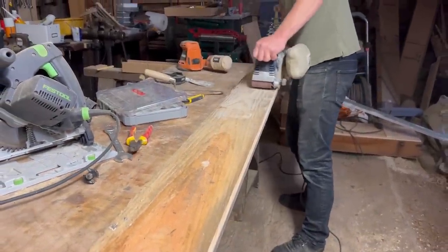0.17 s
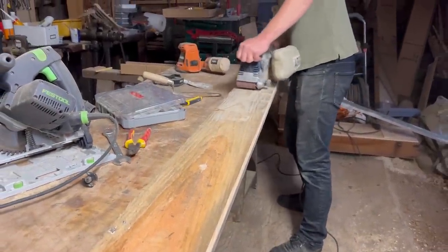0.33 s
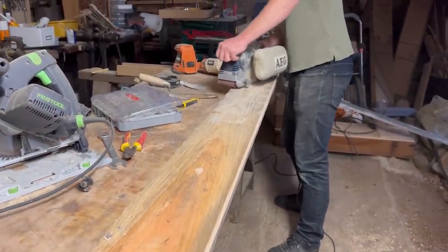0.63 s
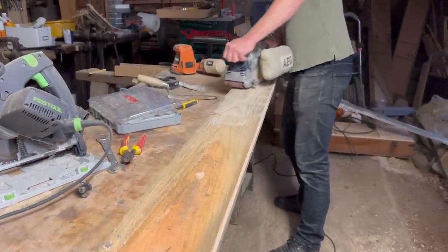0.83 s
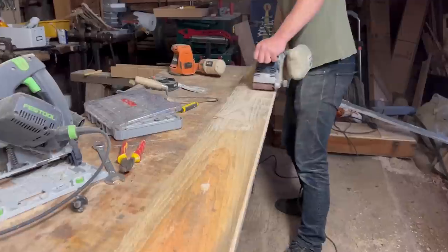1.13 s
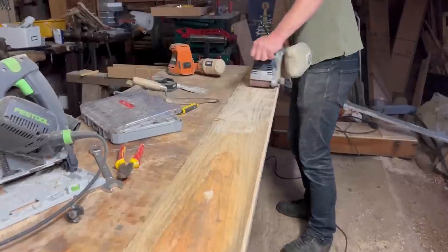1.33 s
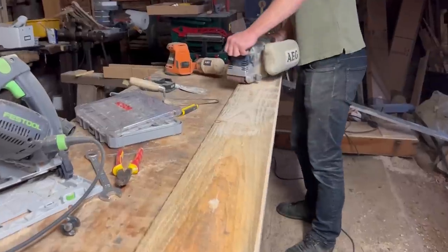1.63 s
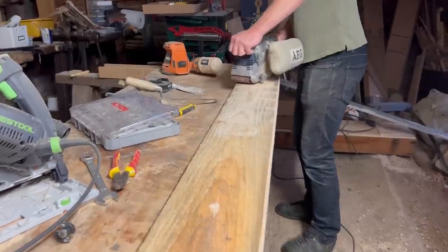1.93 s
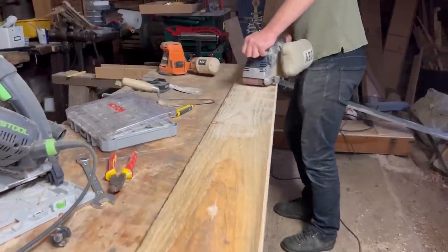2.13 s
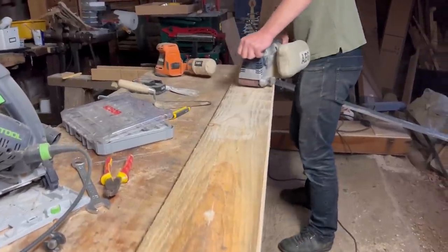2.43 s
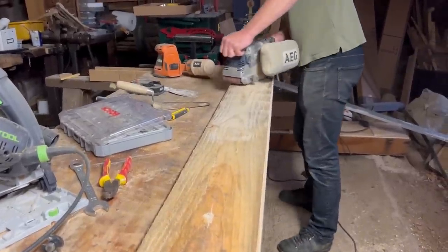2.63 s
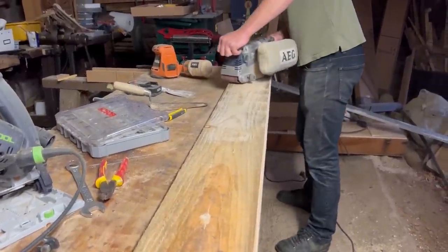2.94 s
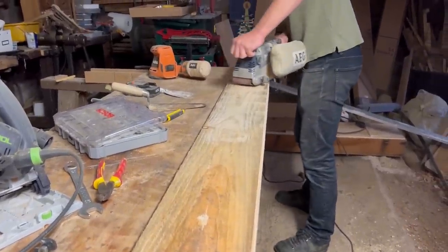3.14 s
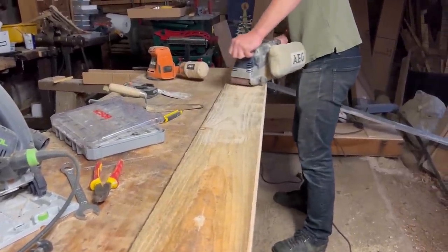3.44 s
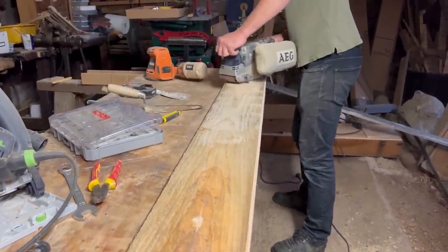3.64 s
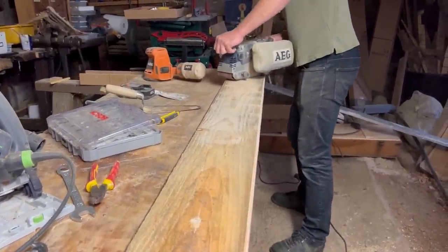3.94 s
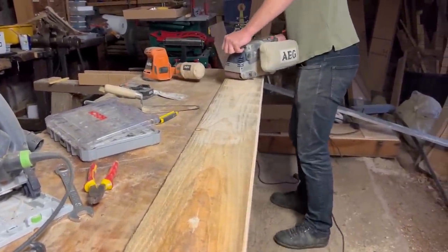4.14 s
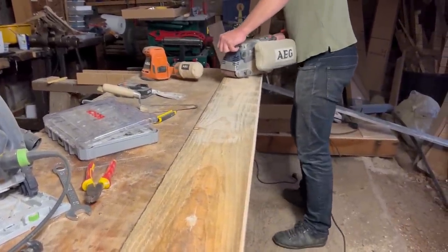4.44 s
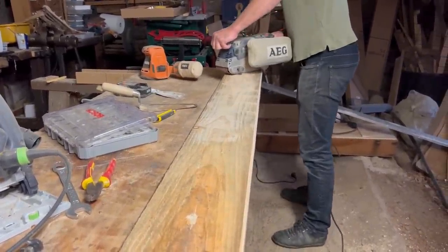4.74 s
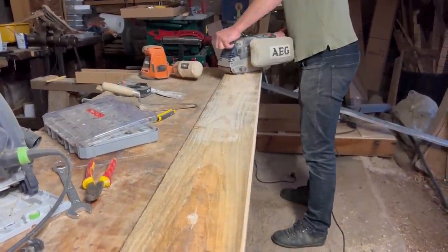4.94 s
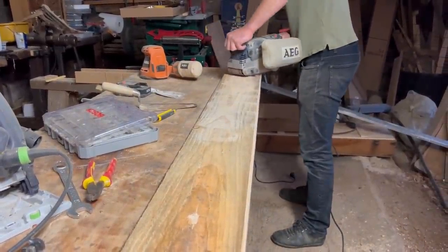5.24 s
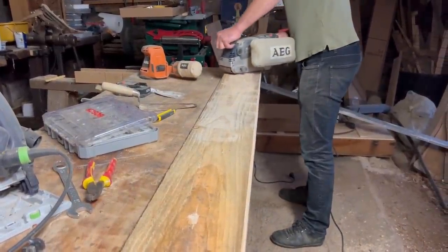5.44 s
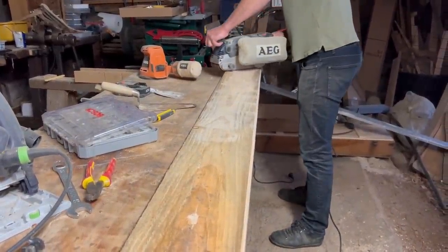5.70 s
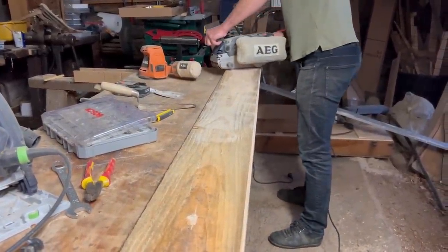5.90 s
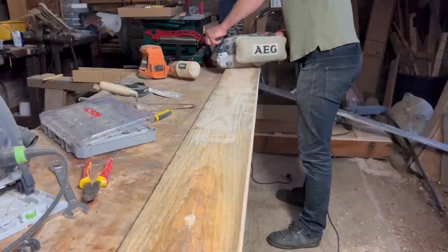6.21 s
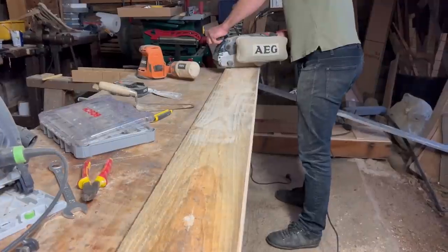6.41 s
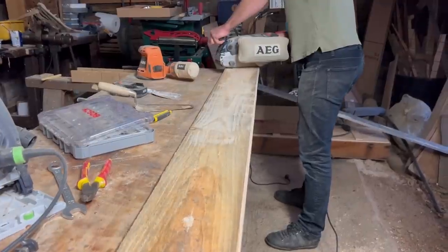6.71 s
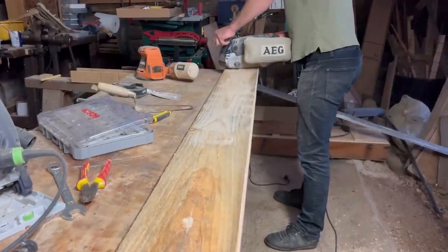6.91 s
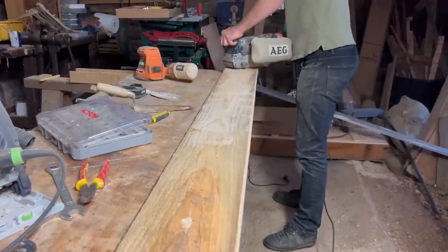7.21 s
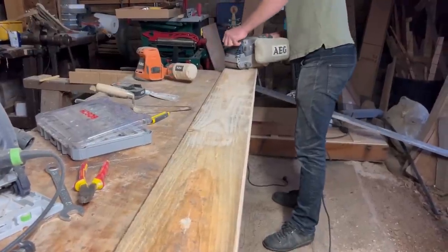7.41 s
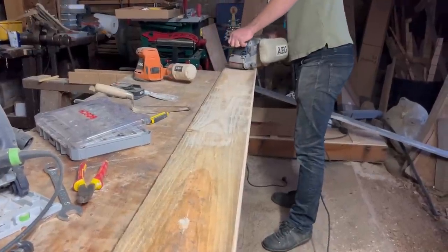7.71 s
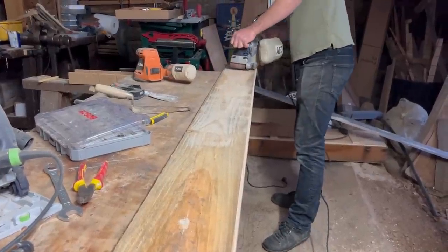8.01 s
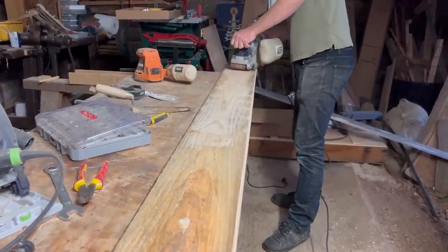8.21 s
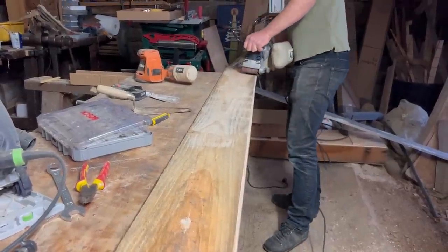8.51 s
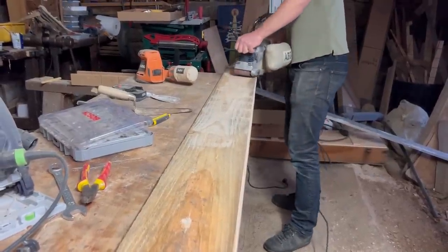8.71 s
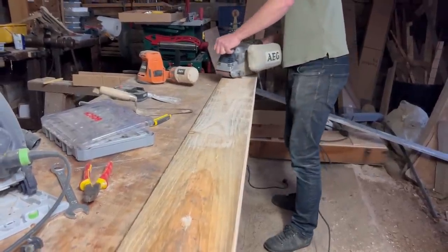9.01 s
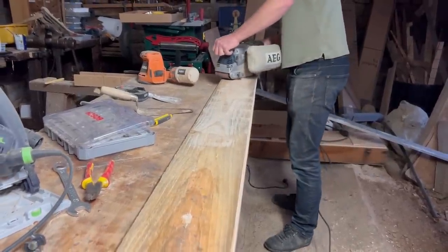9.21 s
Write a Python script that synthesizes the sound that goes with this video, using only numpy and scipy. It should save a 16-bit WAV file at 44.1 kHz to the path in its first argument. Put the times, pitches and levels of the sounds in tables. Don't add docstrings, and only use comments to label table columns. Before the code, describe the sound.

Close stereo sound of a power belt sander in a cluttered indoor workshop, already at speed and never stopping. Rough abrasive hiss covers everything, flickering with pressure and sometimes biting harder at the belt edge. A piercing motor tone is strong early, then comes and goes in dips and swells. Low fluttering knocks and faint hum travel through the board; the motor runs a little faster in the last second or so.

```python
import sys
import numpy as np
from scipy import signal
from scipy.fft import rfft, irfft, next_fast_len
from scipy.io import wavfile
from scipy.ndimage import uniform_filter1d

SR = 44100
rng = np.random.default_rng(int(sys.argv[2]) if len(sys.argv) > 2 else 0)


def elevation(decibels):
    levels = np.asarray(decibels, float)
    return 10 ** (levels / 20)


def persist_wave(psi):
    counts = np.round(np.clip(psi, -1, 1) * 32767).astype(np.int16)
    wavfile.write(sys.argv[1], SR, np.atleast_2d(counts).T)


N = 412335

# start_s, speed_turns_per_s
SHAFT_SPEED = [(0.0, 294.5), (0.33, 293.6), (0.63, 298.7), (0.8, 299.2), (1.7, 291.4), (2.01, 286.1),
               (2.78, 299.5), (3.66, 304.5), (4.04, 302.4), (4.21, 300.1), (4.89, 301.1), (5.14, 304.9),
               (6.25, 299.1), (7.56, 305.1), (8.17, 315.6), (8.61, 317.7), (9.12, 310.0), (9.35, 311.6)]
# centre_s, gain_turns_per_s, half_width_s
HAND_EASING = [
    (1.0, 3.47, 0.11),
    (1.44, 9.2, 0.35),
    (2.23, 20.3, 0.44),
    (3.23, 4.61, 0.2),
    (6.7, 1.47, 0.26),
    (7.14, 2.48, 0.18),
    (8.76, 3.65, 0.22),
]

# start_s, level_db, left_minus_right_db
WHINE_LEVEL = [(0.0, -14, 2), (1.12, -5.5, -12), (1.66, -10.5, 0.5), (1.99, -23.5, 6.5), (2.09, -26.5, -6),
               (2.66, -16.5, -10.5), (2.9, -20, 6), (4.09, -24.5, 5.5), (4.74, -21.5, -15), (5.35, -30, 14),
               (5.58, -22, -5), (6.03, -16, 1), (6.38, -16, 0), (7.13, -22.5, -13), (7.76, -15.5, -18.5),
               (8.13, -19, 0.5), (8.24, -22, 6), (9.35, -15.5, -12.5)]
# centre_s, level_db, half_width_s
WHINE_CRESTS = [(5.35, 3.5, 0.03), (.33, 2, 0.058), (1.28, -2, .07), (1.9, 3, 0.1), (2.595, -14, 0.04),
                (3.13, 5.5, 0.056), (3.35, 2.5, 0.064), (4.3, -1.5, 0.073), (5.72, -3, 0.051),
                (4.63, -5, 0.05), (4.125, -5, .025), (6.6, -1.5, 0.13), (7.05, 2, 0.045), (7.26, 3, 0.046),
                (7.62, -4, .06), (8.1, -1, .04), (9.22, 3.5, .04), (3.16, -5, .03), (4.8, -2, 0.04),
                (2.7, -1, .05), (7.9, 0, 0.073), (9.31, 1.5, .03)]
# centre_s, signed_share_left, half_width_s
LEFT_NULLS = [(0.953, 0.27, 0.49), (1.506, 0.15, 0.22), (2.075, 0.91, 0.027), (2.17, -0.09, 0.017),
              (2.358, 0.32, 0.048), (2.529, -0.4, 0.039), (2.605, -0.12, 0.033), (3.155, -0.25, 0.077),
              (3.44, .55, 0.062), (3.7, .6, 0.06), (4.12, 0.067, 0.06), (4.425, 0.55, 0.035),
              (4.607, 0.95, 0.049), (4.93, 0.71, 0.065), (5.36, 0.92, 0.033), (5.716, 0.75, 0.085),
              (7.176, 0.465, 0.035), (7.222, -0.35, 0.11), (7.6, 0.44, .04), (7.921, -0.13, 0.055),
              (8.06, 0.66, .04), (8.319, -0.55, 0.22), (8.583, 0.34, 0.15), (8.757, 0.076, 0.029),
              (8.798, 0.31, 0.068), (9.26, 0.33, 0.023)]
# centre_s, signed_share_left, half_width_s
RIGHT_NULLS = [(0.635, 0.28, 0.25), (0.942, 0.15, 0.7), (1.553, -0.007, 0.26), (1.801, 0.297, 0.043),
               (2.054, -0.44, 0.022), (2.351, 0.4, 0.082), (2.606, -0.21, 0.26), (3.115, 0.47, 0.055),
               (3.538, 0.87, 0.038), (3.622, -0.24, 0.13), (4.621, 0.25, 0.27), (4.936, 0.25, 0.08),
               (5.344, 0.28, 0.034), (5.35, -0.835, 0.044), (6.873, 0.36, 0.16), (7.336, 0.16, 0.39),
               (7.63, -0.29, 0.38), (7.868, 0.17, 0.12), (7.911, 0.68, 0.033), (8.057, 0.2, 0.14),
               (8.514, 0.036, 0.035), (8.596, -0.12, 0.051), (8.761, 0.21, 0.037), (8.782, -0.43, 0.049),
               (9.171, 0.16, 0.45), (9.347, 0.55, 0.019)]
# centre_s, share_left, half_width_s
SHARED_NULLS = [(3.13, 0.43, 0.05), (4.1, 0.44, 0.029), (4.33, 0.83, 0.051), (4.62, 0.71, 0.091),
                (5.35, 0.59, 0.053), (6.97, 0.84, 0.038), (7.8, 0.66, .12)]

TONE_ORDERS = (2, 12, 14, 18)
TONE_LEVELS = (-46, -31, -35, -32.5)
# right_minus_left_db, left_lead_rad
TONE_SIDES = [(-2.5, 0.67), (-19, 1.36), (-4.5, 0.093), (-34, -1.3)]
# centre_s, half_width_s
NULLS_2X = [(.22, .1), (.6, 0.45), (1.89, 0.13), (2.4, 0.087), (2.92, .15), (3.74, 0.22), (4.32, 0.15),
            (4.65, 0.13), (5.0, 0.16), (5.5, 0.1), (8.3, 0.13), (8.8, 0.25), (9.34, 0.12)]
NULLS_12X = [(.15, 0.23), (.75, 0.091), (1.28, 0.37), (1.6, 0.17), (2.33, 0.16), (2.92, 0.14), (3.68, 0.37),
             (4.3, 0.046), (4.6, .08), (4.9, 0.089), (5.19, 0.2), (5.75, 0.15), (7.3, 0.25), (7.8, 0.089),
             (9.2, 0.059)]
NULLS_14X = [(.15, 0.23), (1.16, 0.2), (1.6, 0.054), (2.2, 0.14), (3.4, 0.038), (4.33, 0.21), (4.96, 0.088),
             (5.64, 0.16), (6.35, 0.13), (6.65, 0.4), (7.1, 0.13), (8.56, 0.11)]
NULLS_18X = [(0.0, 0.16), (.33, 0.052), (.55, 0.13), (1.28, 0.3), (2.15, 0.26), (2.5, 0.14), (2.75, 0.2),
             (3.3, 0.29), (3.63, 0.12), (4.01, 0.069), (4.35, 0.045), (4.7, 0.12), (5.19, 0.26),
             (5.6, 0.25), (6.05, 0.05), (6.65, 0.11), (7.0, 0.12), (7.25, .2), (8.2, 0.12), (8.55, 0.083),
             (9.0, 0.059), (9.34, 0.094)]
# multiple_of_shaft, level_db
FAINT_TONES = [(1, -60.5), (5, -51), (7, -44.5), (13, -51), (19, -52), (24, -52)]
TONE_SWELLS = {1: [(2.82, 15, .06), (3.8, 15, 0.38), (5.0, 10, 0.38)], 2: [(.35, 3, 0.074),
               (.97, 11, 0.038), (1.25, 6, 0.21), (1.7, 2, .05), (3.95, 5, .08), (4.85, 6, .12),
               (6.7, -19, .07), (7.3, -1, .1), (7.55, -5, 0.043), (8.3, 7, 0.16), (9.03, -14, .05)],
               19: [(6.48, 15, .1)], 7: [(5.6, 4, .08), (7.32, 7, 0.086), (8.2, -6, .3)],
               12: [(.45, 2, .12), (1.72, -7, .1), (2.08, 2, .1), (4.2, 0, .1), (4.8, 3, .05),
               (5.25, -3, .06), (5.63, -9, .04), (5.95, -2, .05), (6.3, 5.5, 0.22), (6.65, -5, 0.33),
               (7.25, -13, .05), (7.92, -5, .07), (8.07, 0, .05), (8.17, -8, .03), (8.25, 6.5, 0.13),
               (9.28, -6, .05)], 14: [(0.64, 3.5, 0.1), (0.34, 4, 0.052), (2.2, 7, .1), (2.94, -2, 0.12),
               (3.7, 4, 0.045), (3.75, -1, 0.037), (4.9, 4, .08), (5.1, -3, .08), (6.3, -6, .05),
               (7.88, -2, 0.063), (4.5, -4, 0.045), (5.45, 3, .06), (7.7, -3, .04), (9.12, 5, 0.11)],
               18: [(.22, 8, .05), (1.88, 6, 0.068), (2.35, 5, .15), (4.05, -3, .1), (4.23, 1, .04),
               (4.36, -5, .06), (4.5, 4, .05), (4.62, 1, .05), (4.9, -8, 0.19), (5.5, -3, .06),
               (5.77, -9, .06), (6.26, 6, .06), (6.45, 0, 0.072), (6.77, -11, 0.073), (7.62, 3, .15),
               (7.81, -4, 0.035), (8.1, -11, 0.092), (9.17, 3, .04), (9.28, -5, .06), (6.37, -5, .05)]}

# start_s, hand_pressure_db, lean_from_grit_to_board_db, board_resonance_hz
SANDING = [(0.0, 1, 2.5, 1270), (0.34, 0.5, -2, 1090), (0.62, -1, 2, 1100), (1.04, 0, 0, 1220),
           (1.38, 1.5, -1.5, 1320), (1.83, 0, 4, 1070), (2.3, -0.5, -2, 1170), (3.1, 0.5, 4, 1040),
           (3.43, 0, -2.5, 1070), (4.0, 0.5, .5, 1160), (5.0, 0, 2, 1240), (5.17, 1, 3, 1200),
           (5.36, -1, 0, 1160), (5.71, 2.2, 3.5, 1360), (6.35, 3, 2, 1410), (7.06, -1.5, 3, 1070),
           (7.92, 2, 3.5, 900), (9.35, 1, 3, 1180)]
SANDING_CENTRES = (500, 1300, 2800, 4500)
PRESSURE_SHARE = (0.64, 1, 1.77, 0.62)
LEAN_SHARE = (0.9, 0.054, -0.39, 0.0084)
# centre_s, over_hiss_db, length_s
EDGE_BITES = [(.96, 2.5, 0.068), (1.44, 0.5, 0.04), (2.107, 4, .06), (3.15, 7.5, 0.15), (3.326, 4, 0.044),
              (4.523, 3, 0.081), (4.802, 2.5, .1), (5.16, 3.5, 0.1), (5.742, 1.5, 0.13), (6.79, 3.5, 0.11),
              (8.38, 4.5, 0.11)]
# centre_s, resonance_hz, level_db, half_width_s
GRAIN = [(.07, 2680, 1, 0.14), (0.151, 362, -10, .12), (.3, 2850, 4, 0.1), (.45, 2750, 2, 0.06),
         (.8, 235, -9, 0.19), (6.5, 2800, 0.5, 0.15), (1.0, 2780, 4.5, .1), (1.4, 1300, -5, 0.087),
         (1.43, 2730, 3, 0.048), (2.05, 2800, 3, 0.12), (2.05, 1280, 4, .08), (2.11, 2750, 2.5, 0.056),
         (2.3, 2750, 6.5, .08), (1.22, 2750, 1, .08), (2.7, 230, -5, .2), (4.65, 2800, 1.5, .15),
         (3.3, 790, 7, 0.078), (4.1, 1160, 3, 0.27), (5.0, 220, -1, 0.42), (5.2, 2820, 2.5, 0.056),
         (5.55, 1300, 2, 0.05), (6.15, 1400, -0.5, 0.17), (6.2, 2800, -4, 0.29), (6.2, 4300, -2, .2),
         (6.8, 480, 9, 0.18), (6.8, 1280, 6, 0.087), (7.05, 1170, -3.5, 0.2), (7.35, 2800, 1.5, 0.14),
         (8.1, 130, -5, .2), (8.15, 70, -8, .25), (8.2, 402, 2, 0.055), (8.45, 1280, 9, 0.038),
         (8.7, 2750, 3.5, 0.11), (8.83, 420, 6, .04), (9.2, 2800, 2, 0.11), (.6, 12500, -5, 0.43),
         (1.5, 12500, -8, 0.09), (2.0, 12300, -5.5, 0.23), (3.25, 12500, 5, .05), (5.22, 12400, 7, .06),
         (5.75, 12500, 1, .05), (2.75, 6000, -5, 0.6), (3.8, 6000, 2.5, 0.94), (2.5, 5800, 6, 0.1),
         (5.5, 6000, -2.5, 0.13), (6.55, 6140, 3, 0.23), (7.4, 6200, 2, 0.21), (8.35, 6000, -4, 0.27),
         (5.7, 780, 4.5, 0.13), (7.9, 790, 6, .08)]
# frequency_hz, density_db_per_hz
GRIT_COLOUR = [(30, -19), (90, -14), (180, -12.5), (400, -5), (700, -6.5), (1300, -0.5), (2100, 2),
               (2900, 3.5), (3800, -1.5), (6300, -1), (7500, -9), (9000, -9.5), (12000, -12.5),
               (15500, -15.5)]
# centre_hz, width_hz, level_db
BODY = [(189, 22, -2.5), (279, 6.9, -13), (312, 27, 4), (480, 48, 5), (660, 19, -3), (780, 71, 1.5),
        (2680, 390, 0.5), (1540, 40, -4), (2370, 690, -4), (428, 65, -4.5), (5230, 440, 2),
        (6790, 210, 2.5), (8440, 560, -3), (9400, 790, -0.5)]

# start_s, hum_db, joint_knock_db
BOARD_LOW_END = [(0.0, -33.5, -51), (0.42, -60, -52), (0.73, -46, -52), (0.96, -57, -54),
                 (1.19, -58, -49.5), (2.03, -63, -54.5), (2.34, -39.5, -53), (2.6, -73, -53.5),
                 (3.3, -42, -54.5), (3.74, -68, -58), (3.96, -51, -57.5), (4.67, -48, -52),
                 (5.22, -42, -54.5), (5.85, -49, -52), (7.0, -47.5, -59), (8.04, -63, -56),
                 (8.51, -60, -49), (9.34, -44, -48)]
# mode_hz, level_db, t60_s
BOARD_MODES = [(100, -24, 0.27), (125.3, 7, 0.17), (135, 0, 0.18), (157.8, 1.5, 0.39), (220, -11, 0.23),
               (253.4, -13, 0.24), (313, -30, 0.2), (475, -27, 0.2)]
# centre_s, level_db, half_width_s
PLATEN_FLAT = [(1.3, 2, 0.14), (2.34, 12, 0.12), (3.32, 12, 0.24), (3.95, 13.5, 0.19), (4.67, -3, 0.25),
               (5.25, 11, 0.11), (6.7, 7, .2), (7.0, -11, 0.16), (7.5, 8, 0.44), (8.5, 3, 0.18),
               (9.3, -8, .2)]
# centre_s, level_db, half_width_s
KNOCK_ROCKS = [(.37, -5, 0.045), (.65, 1, .15), (1.55, -4, 0.13), (2.07, -7, .05), (2.6, -8, .05),
               (3.05, -7, .05), (3.7, -1, 0.043), (5.67, -7, .06), (6.93, -7, .06), (7.15, 7, .1),
               (7.65, -6, .08), (8.05, -4, .12), (8.55, 2, .3), (9.0, -2, .05)]
# centre_s, level_db, half_width_s
HUM_ROCKS = [
    (.05, -7, .15),
    (.95, -5, .05),
    (1.1, 3, .06),
    (5.85, -6, .1),
    (6.55, -7, .2),
    (7.5, 7.5, 0.18),
    (7.76, -15, .05),
]

# frequency_hz, left_minus_right_db, likeness_0_to_1, left_lead_rad
PORTS = [(90, .2, .985, .15), (180, .9, .95, .22), (300, 1.8, .92, .3), (480, 1.8, .82, .5),
         (620, .5, .6, .62), (850, 1, .62, .7), (1200, .2, .8, .7), (1550, -.6, .62, .8),
         (2200, 0, .32, 1.3), (3000, 6.6, .45, 1), (3600, 8, .35, -.3), (5500, 10.8, .25, -.8),
         (6500, 8.8, .2, -.3), (7300, 2.6, .5, -.6), (8500, .3, .6, -1.5), (9300, .8, .55, -2.3),
         (9800, 0, .92, -3), (10450, 0, .92, -3.3), (11200, 0, .7, -4), (12100, 0, .72, -5),
         (12650, 0, .93, -6.15), (14100, 0, .95, -6.45), (14600, 0, .55, -7.6), (15300, 0, .6, -8.6)]


def whine(turns):
    level_db, pan_db = in_time(WHINE_LEVEL)
    left_lead_rad = 0.5
    left = nulls(LEFT_NULLS) * elevation(pan_db / 2) * np.exp(1j * left_lead_rad)
    right = nulls(RIGHT_NULLS) * elevation(-pan_db / 2)
    room = np.array([left, right]) * nulls(SHARED_NULLS) * elevation(swells(WHINE_CRESTS))
    wobble = 1 + 0.084 * np.cos(2 * np.pi * 0.4 * turns)
    phase = 2 * np.pi * 6 * turns + 0.05 * drift(40)
    own_flutter_db = 0.41 * np.array([drift(13.0), drift(7.5)])
    flutter = elevation(0.11 * drift(24) + own_flutter_db)
    return np.sqrt(2) * elevation(level_db) * wobble * flutter * np.imag(room * np.exp(1j * phase))


def shaft_tones(turns):
    tones = []
    null_tables = (NULLS_2X, NULLS_12X, NULLS_14X, NULLS_18X)
    for order, db, rows, side in zip(TONE_ORDERS, TONE_LEVELS, null_tables, TONE_SIDES):
        fade = nulls([(s, 0.35, width) for s, width in rows])
        tones.append((order, db + 20 * np.log10(abs(fade) + 1e-6), *side))
    tones += [(order, db, -3, 0.6) for order, db in FAINT_TONES]
    out = np.zeros((2, N))
    for order, db, right_db, lead in tones:
        jitter_rad = 0.025 * order + 0.55 * (order > 13) + 0.5 * (order > 17)
        phase = 2 * np.pi * order * turns + jitter_rad * drift(12)
        db = db + swells(TONE_SWELLS.get(order, []))
        left_db = db + 1.5 + 2.0 * drift(19) + 1.54 * drift(4.6)
        out[0] += elevation(left_db) * np.sin(phase)
        right_level_db = db + 4.5 + right_db + 2 * drift(6.1)
        out[1] += elevation(right_level_db) * np.sin(phase - lead + 0.5 * drift(3.0))
    return out


def grit(laps):
    pressure_db, lean_db, rasp_hz = in_time(SANDING)
    levels = np.outer(PRESSURE_SHARE, pressure_db) + np.outer(LEAN_SHARE, lean_db)
    levels = levels - levels.mean(axis=1, keepdims=True)
    scratches = rng.standard_normal((2, 2, N)) * elevation(0.24 * rng.exponential(1, (2, 2, N)))
    scratches /= scratches.std()
    time = np.arange(N) / SR
    bites = sum(db * np.exp(-(3.6 * (time - s) / length) ** 4) for s, db, length in EDGE_BITES)
    lap_pressure = 0.41 * drift(57) + 0.36 * np.cos(2 * np.pi * laps)
    together = 0.6 * drift(3.4)
    edges = 30 * 2 ** np.r_[0, np.arange(1, 9.2, 1 / 3)]
    out, last = 0, drift(8)
    for k, (low, high) in enumerate(zip(edges, edges[1:])):
        hz = np.sqrt(low * high)
        shares = [np.interp(np.log(hz), np.log(SANDING_CENTRES), row) for row in np.eye(4)]
        own = drift(23.4) + 0.5 * drift(0.96)
        cutting = np.interp(hz, (1200, 2640, 6000, 8350), (0.061, 0.69, 0.99, 0.086))
        steady = np.interp(hz, (200, 400, 6500, 9000), (0.11, 0.85, 0.99, 0.32))
        gain_db = steady * (shares @ levels + 0.87 * (own + last))
        gain_db = gain_db + cutting * bites + np.sqrt(cutting) * lap_pressure + together
        gain_db = gain_db + swells(grain_at(hz))
        if 600 < hz < 2000:
            gain_db = gain_db + 2.47 * np.exp(-(np.log(hz / rasp_hz) / 0.2) ** 2)
        band = signal.butter(2, [low, high], "band", fs=SR, output="sos")
        out = out + elevation(gain_db) * signal.sosfilt(band, scratches[k % 2])
        last = own
    return elevation(-17) * board_colour(out)


def grain_at(hz):
    return [(s, db * np.exp(-(np.log2(hz / at) / 0.2) ** 2), width) for s, at, db, width in GRAIN]


def board_colour(x):
    size = next_fast_len(N)
    hz = np.arange(size // 2 + 1) * SR / size
    colour_db = at_hz(GRIT_COLOUR, hz)[0]
    colour_db = colour_db + sum(db / (1 + (2 * (hz - at) / width) ** 2) for at, width, db in BODY)
    ripple = uniform_filter1d(rng.standard_normal((2, len(hz))), size=300)
    colour_db = colour_db + 1.95 * ripple / ripple.std() * (hz < 7000)
    return irfft(rfft(x, size) * elevation(colour_db), size)[:, :N]


def joint(laps):
    first_db = in_time(BOARD_LOW_END)[1] + swells(KNOCK_ROCKS)
    second_db = first_db + 2.5 + swells(PLATEN_FLAT)
    front, back = (np.flatnonzero(np.diff(np.floor(laps + offset))) for offset in (0.25, 0.72))
    at = np.r_[front, back]
    roller_db = np.r_[np.zeros(len(front)), np.full(len(back), -9.0)]
    chances = rng.normal(0, 1.9, (len(BOARD_MODES), len(at)))
    out = np.zeros(N)
    for (hz, db, t60), chance_db in zip(BOARD_MODES, chances):
        drive_db = first_db if hz < 140 else second_db
        clicks = np.zeros(N)
        clicks[at] = elevation(drive_db[at] + db + roller_db + chance_db + 6.0)
        out += ring(clicks, hz, t60)
    return signal.sosfilt(signal.butter(2, [88, 450], "band", fs=SR, output="sos"), out)


def motor_hum():
    hum_hz = 100.6
    hum_db = in_time(BOARD_LOW_END)[0] + swells(HUM_ROCKS)
    return elevation(hum_db + 2.5) * np.sin(2 * np.pi * hum_hz * np.arange(N) / SR + 0.32 * drift(2))


def halo(turns):
    blur = drift(19) + 1j * drift(22)
    return elevation(-46) * np.imag(blur * np.exp(2j * np.pi * 6 * turns))


def ports(near, diffuse):
    size = next_fast_len(N)
    shade_db, alike, lead = at_hz(PORTS, np.arange(size // 2 + 1) * SR / size)
    alike = np.clip(alike, 0, 1)
    shared = alike * np.exp(-1j * lead) * rfft(near, size)
    walls = np.sqrt(1 - alike ** 2) * rfft(diffuse, size)
    return np.array([near, irfft((shared + walls) * elevation(-shade_db), size)[:N]])


def swells(rows):
    time = np.arange(0, N + 64, 64) / SR
    bells = sum(gain * np.exp(-np.square((time - s) / width)) for s, gain, width in rows) + 0 * time
    return np.interp(np.arange(N) / SR, time, bells)


def nulls(rows):
    time, gain = np.arange(0, N + 64, 64) / SR, 1
    for s, share, width in rows:
        away = (time - s) / max(width, 0.01)
        gain = gain * (away + 1j * share) / (away + 1j)
    now = np.arange(N) / SR
    return np.interp(now, time, gain.real) + 1j * np.interp(now, time, gain.imag)


def ring(clicks, hz, t60):
    r, w = elevation(-60 / (t60 * SR)), 2 * np.pi * hz / SR
    return signal.lfilter([0, np.sin(w)], [1, -2 * r * np.cos(w), r * r], clicks + 1e-18)


def drift(rate):
    r = np.exp(-80 * np.pi * rate / SR)
    noise = rng.standard_normal(N // 40 + 2002)
    slow = signal.lfilter([1], [1, -2 * r, r * r], noise)[2000:]
    return np.interp(np.arange(N) / 40, np.arange(len(slow)), slow / slow.std())


def in_time(rows):
    s, *columns = np.transpose(rows)
    return [np.interp(np.arange(N) / SR, s, c) for c in columns]


def at_hz(points, hz):
    f, *columns = np.transpose(points)
    return [np.interp(np.log(hz + 1e-9), np.log(f), c) for c in columns]


def scene():
    turns = np.cumsum(in_time(SHAFT_SPEED)[0] + swells(HAND_EASING)) / SR
    laps = 0.03677 * turns
    near, diffuse = grit(laps)
    board = ports(near + joint(laps) + motor_hum(), diffuse)
    return whine(turns) + shaft_tones(turns) + board + halo(turns)


def top_cut(x):
    return signal.sosfilt(signal.butter(12, 15900, fs=SR, output="sos"), x)


def record(dry):
    rolled = signal.sosfilt(signal.butter(1, 70, "high", fs=SR, output="sos"), dry)
    size = next_fast_len(N)
    below_cut = np.arange(size // 2 + 1) * SR / size < 15740
    mix = irfft(rfft(rolled, size) * below_cut, size)[:, :N]
    return top_cut(mix)


dry = scene()
out = record(dry)
persist_wave(out)
```